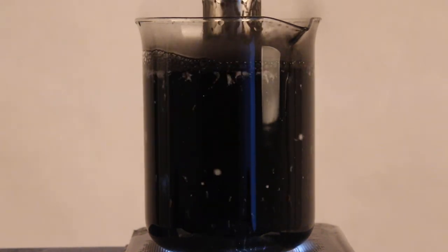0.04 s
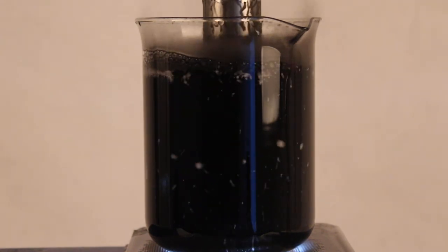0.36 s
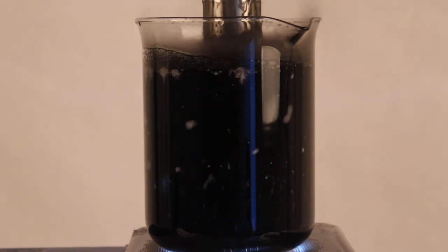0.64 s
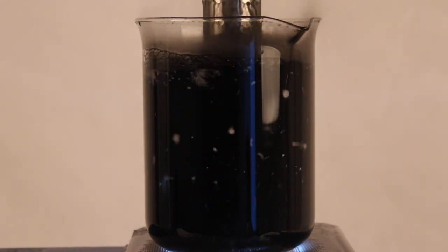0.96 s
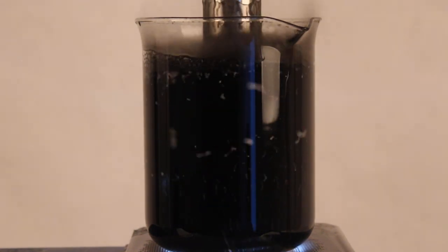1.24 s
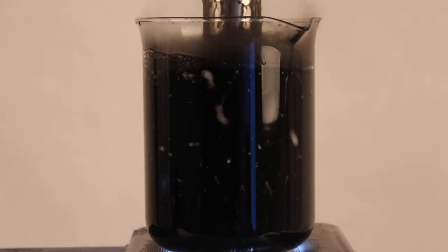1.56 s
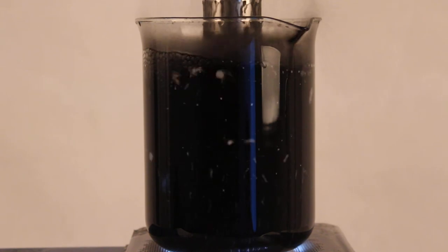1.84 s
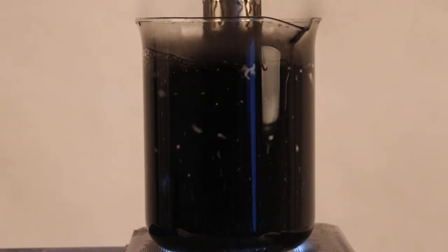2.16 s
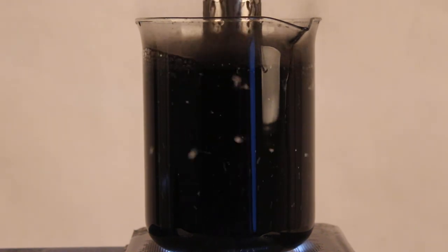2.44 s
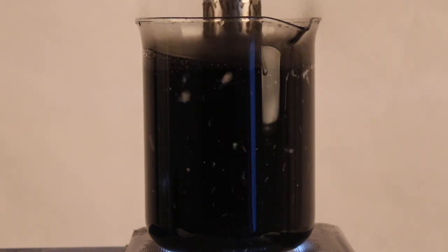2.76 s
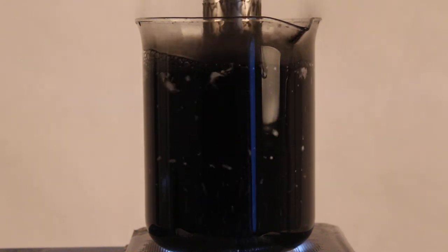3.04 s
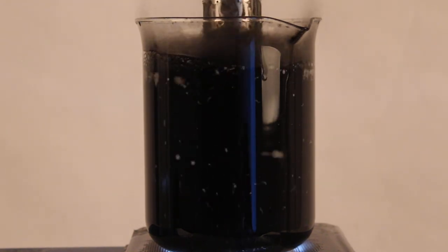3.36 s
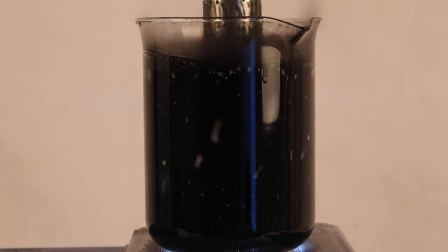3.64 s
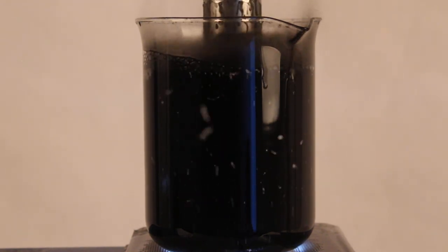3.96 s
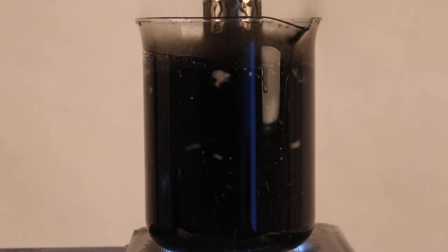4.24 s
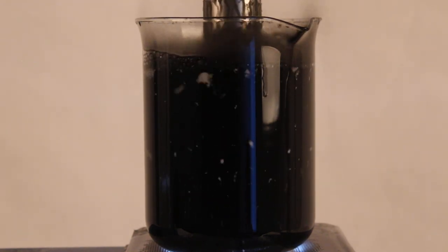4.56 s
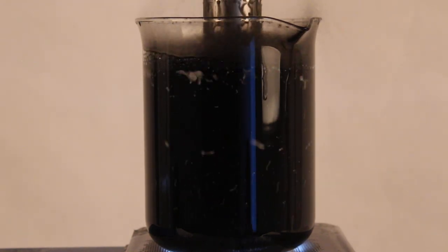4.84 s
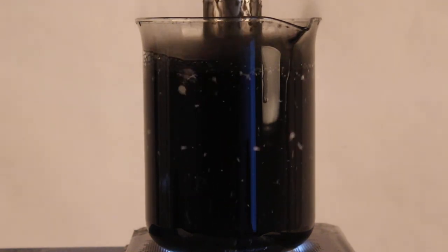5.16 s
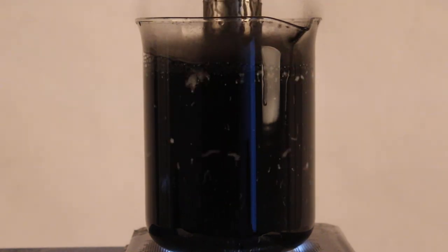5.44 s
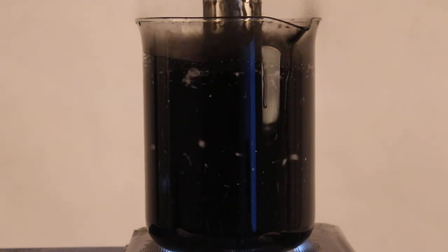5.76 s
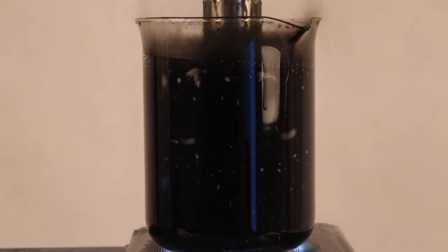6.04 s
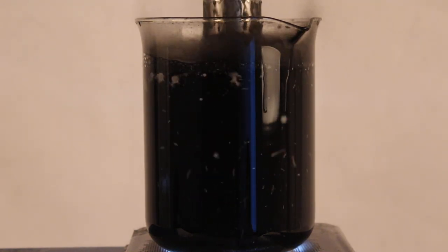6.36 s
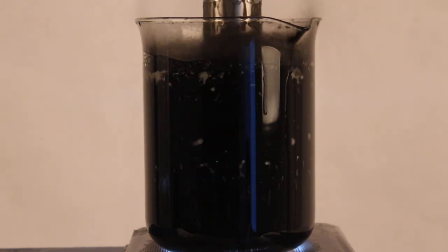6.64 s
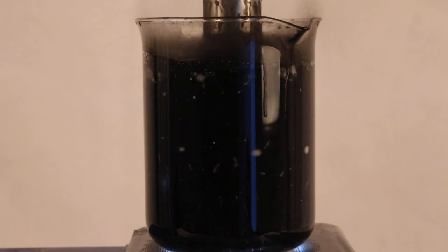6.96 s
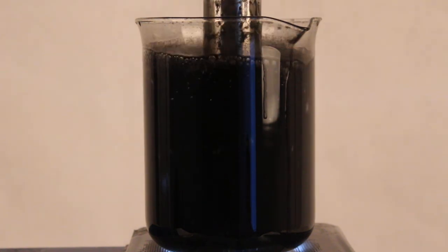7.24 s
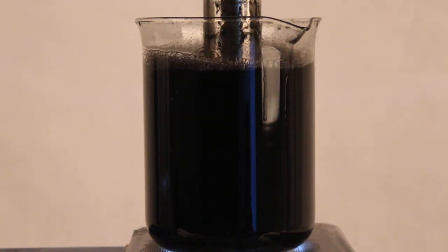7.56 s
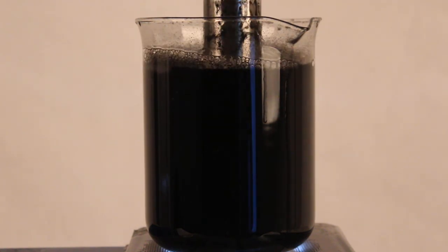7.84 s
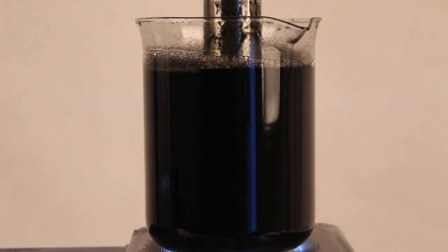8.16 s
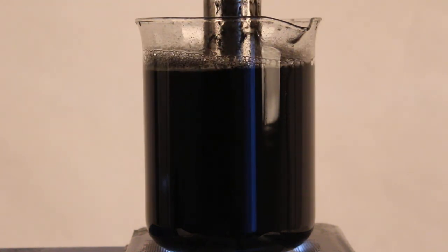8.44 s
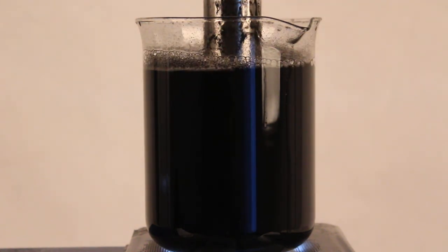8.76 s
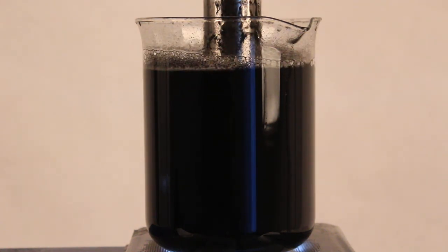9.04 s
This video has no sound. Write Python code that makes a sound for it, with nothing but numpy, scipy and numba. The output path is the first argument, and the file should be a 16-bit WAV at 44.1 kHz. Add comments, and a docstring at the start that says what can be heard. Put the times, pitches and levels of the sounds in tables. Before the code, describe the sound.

A harsh, sizzling buzz comes from liquid being agitated by an ultrasonic probe in a beaker, dotted with brief whistling howls that sag slightly in pitch. It holds loud and even, then stops suddenly near the end with a short room echo. One sharp switch click follows, and quiet fan noise with a steady whine swells up in the lab as the microphone adjusts.

```python
"""An ultrasonic probe makes countless tiny bubbles collapse (cavitation) in a beaker of liquid.
The collapses hiss and ring the glass in a hard-walled lab, and the liquid's lowest resonances sing out
in spurts that sag in pitch as bubbles gather. The probe stops, the room rings out, a switch clacks,
and an automatic gain control slowly lifts the whine and rush of equipment fans."""
import sys
import numpy as np
from scipy import signal
from scipy.fft import rfft, irfft, next_fast_len
from scipy.io import wavfile
from scipy.ndimage import uniform_filter1d
from numba import njit

SR = 44100
rng = np.random.default_rng(int(sys.argv[2]) if len(sys.argv) > 2 else 0)


def persist_wave(psi):
    """Save psi, clipped to +-1, as 16-bit WAV."""
    counts = np.round(np.clip(psi, -1, 1) * 32767).astype(np.int16)
    wavfile.write(sys.argv[1], SR, np.atleast_2d(counts).T)


N = 410571
TIME = np.arange(N) / SR
PROBE_STOP_S = 7.154
SAG_OCTAVES_PER_S = 0.18  # gathering bubbles soften the liquid, so every spurt sinks in pitch


def undb(db):
    """Turn decibels into a number to multiply by."""
    return 10 ** (np.asarray(db) / 20)


def unit(x):
    """Scale a signal to an average power of 1."""
    return x / np.sqrt(np.mean(x ** 2))


def at_hz(table, hz):
    """Read between the rows of a (pitch_hz, value) table, with octaves evenly spaced."""
    pitches, values = np.transpose(table)
    return np.interp(np.log(np.maximum(hz, 1)), np.log(pitches), values)


def colour(x, table, share=1):
    """Turn lows and highs up or down by a (pitch_hz, level_db) table, or by a share of its decibels."""
    size = next_fast_len(N + SR)
    gain = undb(share * at_hz(table, np.fft.rfftfreq(size, 1 / SR)))
    return irfft(rfft(x, size) * gain, size)[..., :N]


def wander(turns_per_s):
    """A smooth random drift, typically about 1 in size."""
    hold = max(int(SR / turns_per_s), 1)
    steps = np.repeat(rng.standard_normal(N // hold + 1), hold)[:N]
    return unit(uniform_filter1d(steps, hold))


@njit
def moving_band(x, hz, width_hz):
    """Let through only the sound near a moving pitch (a state-variable filter)."""
    out, band_state, low_state = np.empty(len(x)), 0., 0.
    for i in range(len(x)):
        tuning, damping = np.tan(np.pi * hz[i] / SR), width_hz / hz[i]
        band = (band_state + tuning * (x[i] + 1e-18 - low_state)) / (1 + tuning * (tuning + damping))
        band_state = 2 * band - band_state
        low_state += 2 * tuning * band
        out[i] = damping * band
    return out


def resonate(x, hz, *widths_hz):
    """Ring at a steady or moving pitch, once per width given; narrower sounds purer."""
    for width_hz in widths_hz:
        x = moving_band(x, hz * np.ones(len(x)), float(width_hz))
    return x


# How long the room's echo takes to fade by 60 dB: pitch_hz, fade_s
ROOM_FADE = [(200, 0.47), (1300, 0.79), (3000, 0.6), (5000, 0.58), (10000, 0.36), (15000, 0.18)]
# How wide the echo sounds, as side level over mid level: pitch_hz, side_db
ROOM_WIDTH = [(100, 0.5), (300, -5.5), (700, -11), (1300, -9.5), (2400, -7.5), (4400, -5.5), (8000, -2),
              (15000, -1)]
def room(x, direct_db, ring_s=0):
    """Direct sound plus echo, as mid (what both ears share) and side (how they differ)."""
    hz, age, echo = signal.stft(rng.standard_normal((2, SR)), SR, nperseg=256)
    fade_s = np.maximum(at_hz(ROOM_FADE, hz), ring_s)[:, None]  # a ringing source can outlast the room
    echo = echo * undb(-60 * age / fade_s)
    echo *= np.sqrt(2 * np.log(1000) / (fade_s * SR))  # long and short echoes carry equal energy
    echo[1] *= undb(at_hz(ROOM_WIDTH, hz))[:, None]
    response = signal.istft(echo, SR)[1]
    response[0, 0] += undb(direct_db)
    running = np.pad(x, (SR, 0), mode="reflect")  # the room is already full of sound at the start
    heard = signal.fftconvolve(running[None], response, axes=1)[:, SR:SR + N]
    return heard / np.hypot(1, undb(direct_db))


def probe_on(fade_s=0.023):
    """1 while the probe runs, falling quickly to 0 as the bubbles die."""
    return np.clip((PROBE_STOP_S - TIME) / fade_s + .5, 0, 1)


def collapses(per_s, spread_db):
    """Collapsing bubbles make random clicks, mostly small, a few large."""
    happens = rng.random(N) < per_s / SR
    return unit(happens * rng.standard_normal(N) * undb(spread_db * rng.standard_normal(N)))


# The ringing notes of beaker and probe: pitch_hz, width_hz, relative_level_db
BEAKER_NOTES = [(2455, 74, -3.5), (3667, 106, -0.5), (3806, 110, -0.5), (4715, 450, -1), (5170, 290, -3.5),
                (9930, 430, -0.5)]
def beaker(drift_hz=30, swell_db=4.5, level_db=-5.5):
    """Collapses ring the solid parts; churning bubbles detune and damp each note, the lowest most."""
    sound = 0
    for hz, width_hz, db in BEAKER_NOTES:
        loading = BEAKER_NOTES[0][0] / hz
        clicks = collapses(per_s=9000, spread_db=2.5)
        ring = resonate(clicks, hz + drift_hz * loading * wander(4.2), width_hz)
        sound += ring * undb(db + swell_db * loading * wander(3.4))
    return unit(sound) * undb(level_db)


# The tone colour of the hissing collapses: pitch_hz, relative_level_db
HISS_COLOUR = [(100, -53), (350, -29.5), (700, -16), (1000, -11.5), (1400, 3), (2100, 1.5), (4200, -3),
               (7500, 0), (9400, -2.5), (11500, -8), (13400, -8.5), (14100, -16.5), (16000, -13.5)]
def cavitation(drive_db=-21.5, flutter_db=0.85, hiss_db=-2.0, patches=3):
    """Collapses hiss and ring in several patches of the glass, each with its own path through the room."""
    drive = undb(drive_db + flutter_db * wander(35)) * probe_on()
    hiss = 0
    for _ in range(patches):
        clicks = collapses(per_s=9000, spread_db=1.34)
        hiss += room(unit(colour(clicks, HISS_COLOUR)) * drive, direct_db=-3.5)
    ring = sum(room(beaker() * drive, direct_db=-5.5, ring_s=0.41) for _ in range(patches))
    return (hiss * undb(hiss_db) + ring) / np.sqrt(patches)


# The broad resonances of the bubble cloud: pitch_hz, width_hz, level_db
CLOUD_NOTES = [(1820, 470, -30.5), (2943, 390, -32)]
def cloud(drift_hz=55, swell_db=2.7):
    """The cloud of bubbles keeps ringing between spurts, drifting in pitch."""
    sound = 0
    for hz, width_hz, db in CLOUD_NOTES:
        pitch = hz + drift_hz * wander(6)
        ring = resonate(collapses(per_s=7000, spread_db=0.5), pitch, width_hz, width_hz)
        sound += unit(ring) * undb(db + swell_db * wander(7.3))
    return sound * probe_on()


def spurt(middle_s, length_s, hz):
    """One spurt: the samples it covers, its bell-shaped rise and fall in power, and its sagging pitch."""
    near = slice(*np.searchsorted(TIME, [middle_s - 2 * length_s, middle_s + 2 * length_s]))
    from_middle_s = TIME[near] - middle_s
    bell = .5 ** ((2 * from_middle_s / length_s) ** 2)
    return near, bell, hz * 2 ** (-SAG_OCTAVES_PER_S * from_middle_s)


def even_out(ring, hold_s):
    """Hold a ring's power near 1, averaged over hold_s."""
    power = uniform_filter1d(ring ** 2, int(hold_s * SR))
    return ring / np.sqrt(np.abs(power) + 1e-12)


def flares(spurts, gain_db, wobble_hz, hold_s, stutter_db):
    """Each spurt rings on its own pitch, pure or rough by its width: it swells, wavers, sags and fades."""
    noise = rng.standard_normal(N)
    wobble = wobble_hz * wander(22)
    stutter = undb(stutter_db * wander(45))
    sound = np.zeros(N)
    for middle_s, length_s, hz, width_hz, db in spurts:
        near, bell, pitch = spurt(middle_s, length_s, hz)
        ring = resonate(noise[near], pitch + wobble[near], width_hz, 2 * width_hz)
        sound[near] += undb(db) * np.sqrt(bell) * even_out(ring, hold_s)
    return sound * undb(gain_db) * stutter * probe_on()


# The liquid's howling spurts: middle_s, length_s, pitch_hz, width_hz, relative_level_db
HOWLS = [(.04, .13, 1926, 50, -29), (.17, 0.32, 1820, 160, -30), (.25, 0.023, 1830, 40.2, -25),
         (.57, 0.099, 1730, 35, -30), (.81, 0.19, 1876, 110, -27), (1.26, 0.11, 1910, 35, -30),
         (1.48, 0.029, 1846, 40, -28), (1.68, 0.16, 1744, 45, -27.5), (1.93, 0.2, 1840, 120, -25),
         (2.08, .1, 1760, 90, -36), (2.41, 0.13, 1870, 70, -40.5), (2.59, 0.15, 1710, 25, -29),
         (2.83, 0.19, 1880, 130, -23.5), (3.35, 0.21, 1940, 70, -30), (3.5, 0.17, 1734, 30, -29.5),
         (3.68, 0.15, 1870, 60, -29), (3.86, 0.17, 1735, 30, -30), (3.9, 0.079, 2110, 110, -31),
         (4.13, 0.23, 1938, 35, -29.5), (4.35, 0.065, 1925, 40.3, -27), (4.53, 0.26, 1680, 50, -41.5),
         (4.6, 0.092, 1950, 49.6, -32), (4.84, 0.26, 1862, 40, -29), (5.17, 0.22, 1840, 160, -30),
         (5.52, 0.23, 1800, 119, -27), (5.7, 0.089, 1740, 60, -29), (5.92, .15, 1740, 59.5, -27.5),
         (6.27, 0.17, 1840, 110, -27), (6.52, 0.19, 1915, 40, -27.5), (6.68, 0.061, 1843, 40, -28),
         (6.87, .1, 1780, 80, -25), (7.05, 0.11, 1820, 30, -29)]
def howl():
    """The bubbly liquid howls in one short spurt after another."""
    return flares(HOWLS, gain_db=0.5, wobble_hz=16, hold_s=0.023, stutter_db=2.5)


def note_path(spurts, rest_hz, rest_db, wander_hz, wander_db):
    """A note's pitch and level: it wanders near its rest until a spurt lifts it and pulls its pitch."""
    power = undb(rest_db + wander_db * wander(9.8)) ** 2
    pull = power * (rest_hz + wander_hz * wander(4))
    for middle_s, length_s, hz, db in spurts:
        near, bell, pitch = spurt(middle_s, length_s, hz)
        swell = undb(db) ** 2 * bell
        power[near] += swell
        pull[near] += swell * pitch
    return pull / power, 10 * np.log10(power)


def liquid_note(hz, db, width_hz, gain_db, wobble_hz, hold_s, stutter_db=0):
    """The cloud feeds a resonance of the liquid up to a limit; it can stutter as bubbles come and go."""
    pitch = hz + wobble_hz * wander(12)
    ring = resonate(collapses(per_s=5000, spread_db=1.0), pitch, width_hz, 4 * width_hz)
    return even_out(ring, hold_s) * undb(db + gain_db + stutter_db * wander(35)) * probe_on()


# The liquid's moaning spurts: middle_s, length_s, pitch_hz, relative_level_db
MOANS = [(0.282, 0.46, 1145, -45), (.75, 0.1, 1150, -32), (6.517, 0.36, 1135, -36.5)]
def moan():
    """A faint, lower resonance of the liquid swells now and then."""
    hz, db = note_path(MOANS, rest_hz=1130, rest_db=-58, wander_hz=25.2, wander_db=0.5)
    return liquid_note(hz, db, width_hz=34, gain_db=-1.0, wobble_hz=11, hold_s=0.038)


# The liquid's rasping spurts: middle_s, length_s, pitch_hz, width_hz, relative_level_db
RASPS = [(.66, 0.054, 2800, 100, -29.5), (.92, 0.26, 2890, 120, -38), (1.52, 0.16, 2980, 200, -31.5),
         (2.0, .16, 3660, 100, -40.5), (2.75, 0.44, 2900, 220, -36), (3.85, 0.29, 2870, 80.4, -53),
         (4.2, 0.33, 3030, 60, -41), (4.55, .07, 5270, 120, -33), (4.65, 0.077, 3100, 50, -29),
         (5.23, 0.1, 2950, 120, -30), (5.6, 0.2, 3080, 50, -49), (6.22, 0.14, 3000, 179, -34),
         (6.45, 0.28, 2520, 140, -33)]
def rasp():
    """Higher resonances of the liquid flare up roughly above the howl."""
    return flares(RASPS, gain_db=-1.0, wobble_hz=13, hold_s=0.057, stutter_db=3.4)


# The liquid's singing spurts: middle_s, length_s, pitch_hz, relative_level_db
SUNG_NOTES = [(0.867, 0.12, 1271, -29.5), (1.029, 0.06, 1267, -22), (1.235, 0.042, 1267, -22.5),
              (1.44, 0.11, 1270, -25.5), (1.587, 0.079, 1248, -31), (2.424, 0.13, 1234, -30),
              (2.99, 0.12, 1274, -31), (3.254, 0.073, 1298, -28), (3.46, 0.21, 1245, -33.5),
              (4.112, 0.17, 1196, -34), (4.874, 0.12, 1292, -33), (5.14, 0.28, 1248, -30),
              (6.277, 0.1, 1195, -29.5), (6.887, 0.08, 1327, -29.5), (7.11, 0.091, 1192, -36)]
def sing():
    """A narrow resonance of the liquid sings an almost pure note just above the moan."""
    hz, db = note_path(SUNG_NOTES, rest_hz=1275, rest_db=-41.5, wander_hz=28.3, wander_db=1.6)
    return liquid_note(hz, db, width_hz=10.8, gain_db=1.5, wobble_hz=5, hold_s=0.036, stutter_db=2.5)


def churn(pitch_hz=100, width_hz=130, start_db=-83, builds_at_s=3.6, rise_db_per_s=5):
    """The liquid's low churning holds steady, then builds until the probe stops."""
    rumble = unit(resonate(rng.standard_normal(N), pitch_hz, width_hz, width_hz))
    return rumble * undb(start_db + rise_db_per_s * np.maximum(TIME - builds_at_s, 0)) * probe_on()


# The hits of the switch contacts: start_s, relative_level_db, lowest_hz, highest_hz
SWITCH_HITS = [(7.6677, -19.5, 3000, 5000), (7.679, -27.5, 900, 6500), (7.682, -27, 300, 7500),
               (7.7028, -29, 300, 5500), (7.713, -32, 300, 3500), (7.719, -31, 1200, 6200)]
# The ringing notes of the switch and its panel: pitch_hz, width_hz, gain_db
PANEL_NOTES = [(380, 240, 5), (1360, 1100, 9.5), (2030, 810, 0), (3500, 280, -6), (4420, 540, -20),
               (5530, 450, -3), (7000, 1300, -22)]
def switch(scrape_s=0.0013):
    """Each contact is a very short scrape of its own brightness that rings the panel across the room."""
    push, grit = np.zeros(N), rng.standard_normal(N)
    for start_s, db, low_hz, high_hz in SWITCH_HITS:
        age = TIME - start_s
        scrape = grit * (age >= 0) * np.exp(-np.clip(age / scrape_s, 0, 50))
        band = signal.butter(2, [low_hz, high_hz], "bandpass", fs=SR, output="sos")
        push += undb(db) * signal.sosfilt(band, scrape)
    ring = sum(undb(db) * resonate(push, hz, width_hz) for hz, width_hz, db in PANEL_NOTES)
    return room(ring, direct_db=-4.0)


# The tone colour of the fans' rushing air: pitch_hz, relative_level_db
AIR_COLOUR = [(25, -34), (70, -34), (115, -15.5), (160, -7), (300, -3), (390, 1.5), (650, -5), (1100, -1.5),
              (1420, 1), (2300, -3.5), (3350, -5), (4400, -13), (5000, -11.5), (5750, -17.5), (6050, -16.5),
              (6600, -23), (9300, -20), (15500, -35.5)]
# The tones of blades and motors: pitch_hz, relative_level_db
FAN_WHINE = [(43.1, -61), (271.3, -36.5), (377, -54), (474, -54), (1355.7, -33.5), (1474, -33.5),
             (1627, -39), (1835, -53), (2213, -62), (2830, -53), (4070, -61)]
def fans(gain_db=-25.5, air_db=-25.5, waver_share=0.0004, flicker_db=1.0):
    """Fans run throughout: rushing air fills the room, and blade and motor tones waver slightly."""
    air = unit(colour(rng.standard_normal(N), AIR_COLOUR))
    sound = room(air, direct_db=-2.5) * undb(air_db)
    speed = 1 + waver_share * wander(6)
    for hz, db in FAN_WHINE:
        phase = 2 * np.pi * np.cumsum(hz * speed) / SR
        sound[0] += np.sqrt(2) * np.sin(phase) * undb(db - flicker_db * wander(3.4))  # mid only
    return sound * undb(gain_db)


# How the sound leans to the left, before scaling by share: pitch_hz, left_minus_right_db
LEAN = [(60, -3), (200, -4.5), (700, -0.5), (2400, -1.2), (4400, .5), (9000, 1)]
def scene():
    """Add up every source in the room, then turn mid and side into left and right."""
    sound = cavitation()
    sound += room(cloud() + moan() + churn(), direct_db=-4.5)
    sound += room(howl() + rasp(), direct_db=3)
    sound += room(sing(), direct_db=4)
    mid, side = sound + switch() + fans()
    return np.array([colour(mid + side, LEAN, share=0.4), colour(mid - side, LEAN, share=-0.4)])


def gain_control(x, target_db=-20.3, climb_db_per_s=13.0, most_db=26):
    """Loud sound holds the volume down; in quiet it climbs at a steady rate to its maximum."""
    power = uniform_filter1d(np.mean(x ** 2, axis=0), SR // 10)
    allowed_db = np.clip(target_db - 10 * np.log10(np.abs(power) + 1e-12), 0, most_db)
    climb_db = climb_db_per_s * TIME
    return x * undb(np.minimum.accumulate(allowed_db - climb_db) + climb_db)


def record(dry):
    """Automatic gain, then a steep cut of the highest treble."""
    treble_cut = signal.ellip(12, .1, 80, 15650, fs=SR, output="sos")
    return signal.sosfilt(treble_cut, gain_control(dry))


dry = scene()
out = record(dry)
persist_wave(out)
```